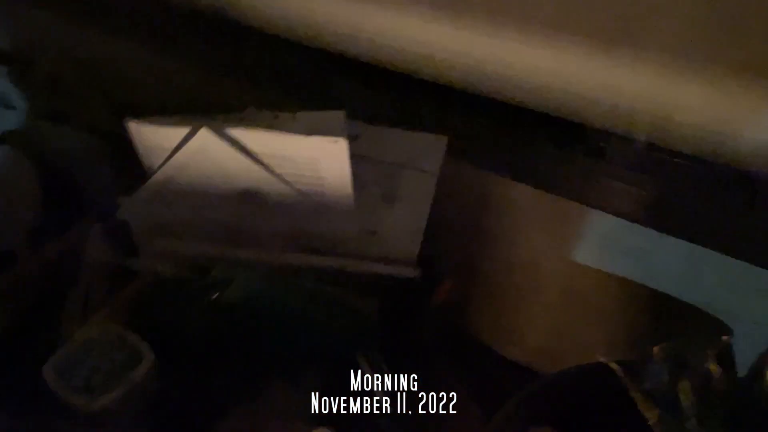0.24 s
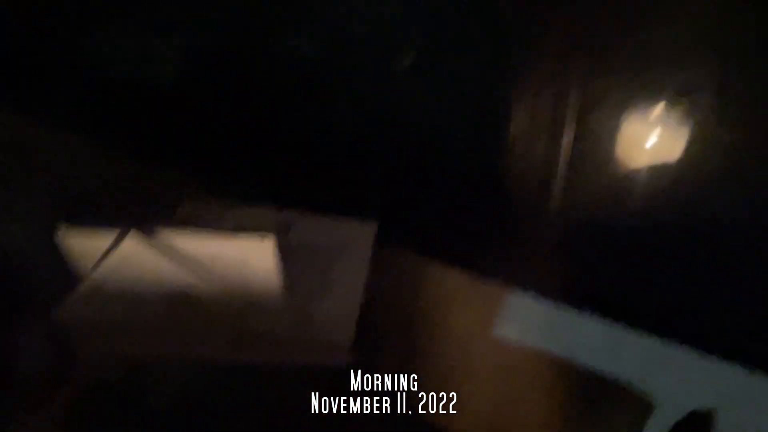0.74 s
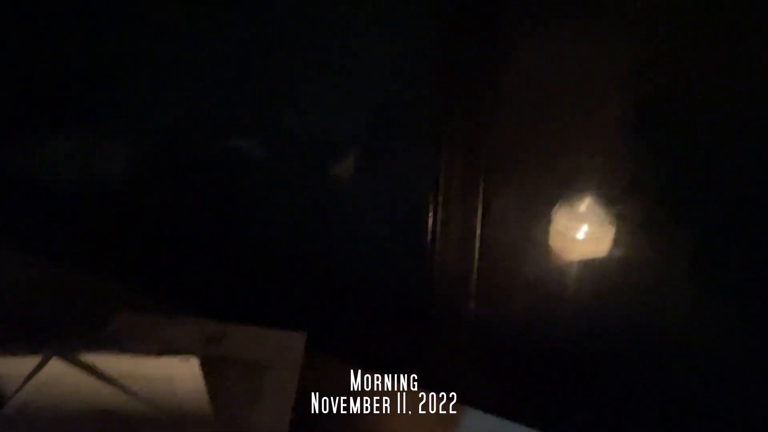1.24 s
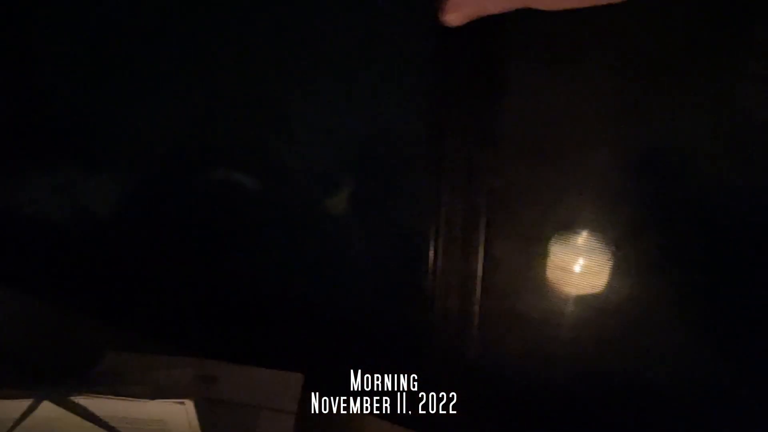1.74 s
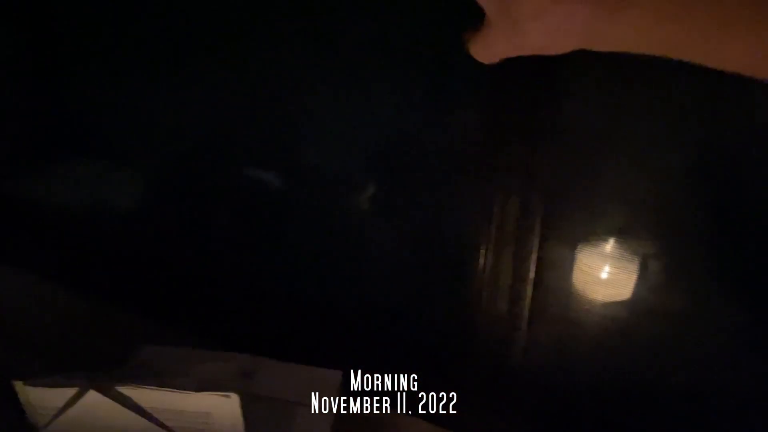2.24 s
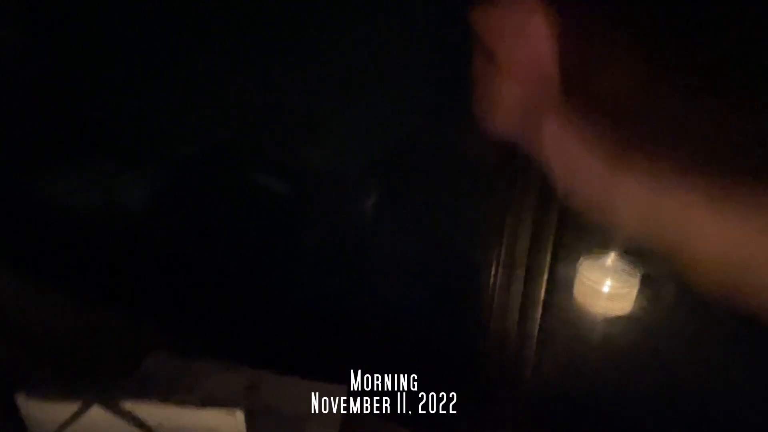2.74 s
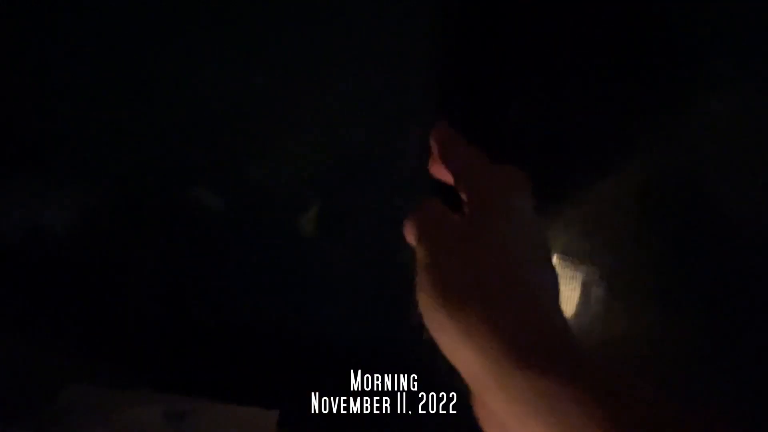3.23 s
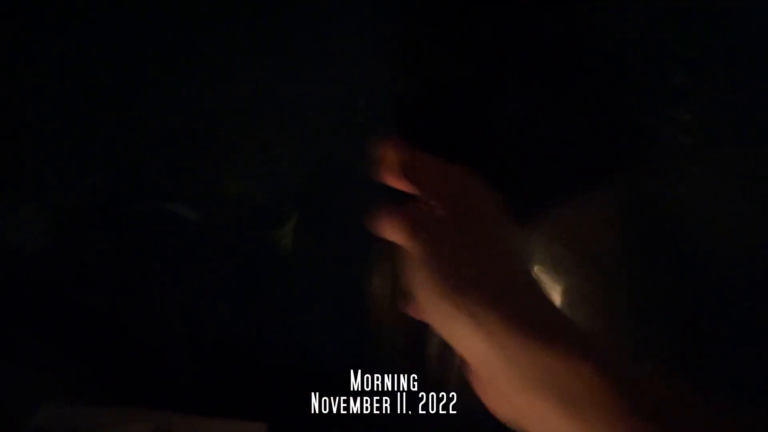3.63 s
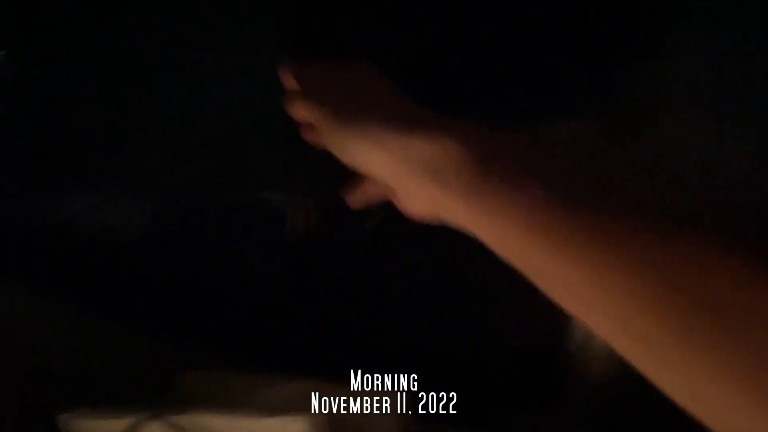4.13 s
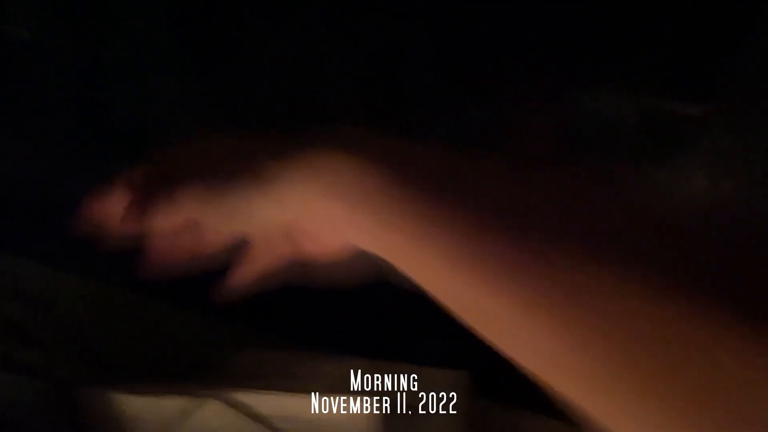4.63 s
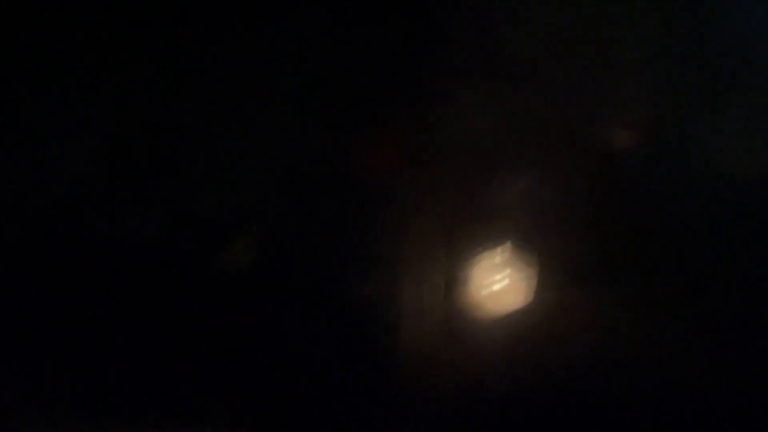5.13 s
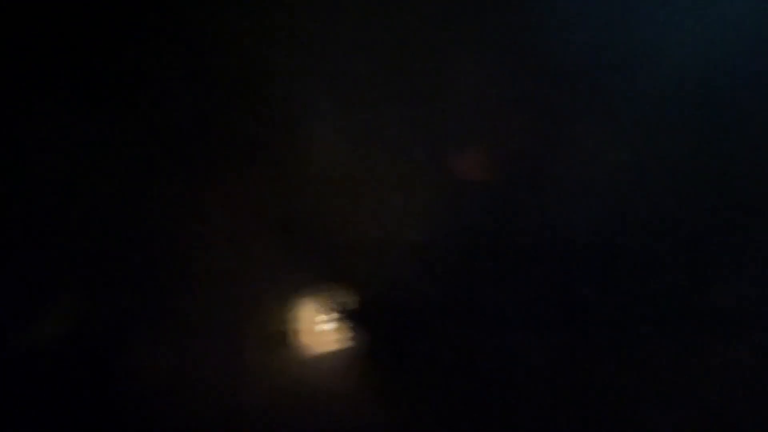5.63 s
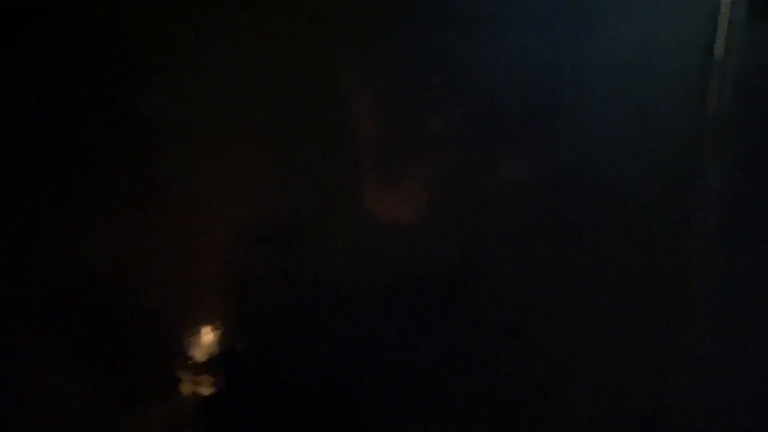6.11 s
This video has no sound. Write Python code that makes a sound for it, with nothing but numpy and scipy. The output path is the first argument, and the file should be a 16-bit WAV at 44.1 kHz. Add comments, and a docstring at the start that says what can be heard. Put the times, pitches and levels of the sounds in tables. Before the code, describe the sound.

In a small, quiet vehicle cabin, heard close by a handheld stereo microphone, knocks at 0.15-0.2 s start a ribbed blind rubbing along its rail. Its ribs blur into a rough whistle, sweeping up to about 0.5 s and down until 0.75 s, slightly left, with small ticks at 0.8-0.9 s. Then it is nearly silent, with faint touches and soft low bumps around 1.7-2.3 s. A crisp, hard latch clack snaps at 2.46 s, followed by a lighter bright click at 2.79 s. Small knocks at 3.3 s lead into a bright, scraping panel slide from 3.45 to 4.55 s, with a brief ribbed buzz near 3.8 s and the loudest blow, a deep thunk and sharp clack, at 4.27 s, rattling after. Smaller knocks fade by 5 s. Dull knocks return at 5.5 s, then soft rubbing and handling bumps until 6.37 s, over faint hiss and slight hum.

```python
"""A ribbed blind rubs and whistles along its rail, then a panel slides, among latch clacks and knocks on
the frame, inside a small, quiet vehicle cabin. Blows are modal ringing plus bursts of noise; friction is
coloured noise; the whistle is a sine that follows the rib rate. Low bumps are falling sines, handling
rumble is resonant noise, and the background is a faint hiss and hum. A hand-held two-port recorder hears it."""
import sys
import numpy as np
from scipy import signal
from scipy.fft import rfft, irfft, next_fast_len
from scipy.io import wavfile

SR = 44100
rng = np.random.default_rng(int(sys.argv[2]) if len(sys.argv) > 2 else 0)


def persist_wave(psi):
    """Save psi, clipped to +-1, as 16-bit WAV."""
    counts = np.round(np.clip(psi, -1, 1) * 32767).astype(np.int16)
    wavfile.write(sys.argv[1], SR, np.atleast_2d(counts).T)


def boost_factor(decibels):
    """Convert a level in decibels to a linear amplitude factor."""
    exponent = np.asarray(decibels, float) / 20
    return 10 ** exponent


N = 280917


def rms_one(x):
    """Normalisation: scale to unit rms."""
    return x / np.sqrt(np.mean(x ** 2) + 1e-20)


def in_time(rows):
    """Linear interpolation: table columns per sample, -150 outside the rows."""
    s, *columns = np.transpose(rows)
    return [np.interp(np.arange(N) / SR, s, column, left=-150, right=-150) for column in columns]


def at_hz(points, hz):
    """Logarithmic pitch scale: read a spectrum on a log-frequency axis."""
    points_hz, values = np.array(points).T
    return np.interp(np.log(hz), np.log(points_hz), values)


def drift(rate_hz):
    """Low-pass random process: slow chance of spread 1, computed at every 20th sample."""
    r = np.exp(-40 * np.pi * rate_hz / SR)
    white = rng.standard_normal(N // 20 + 4002)
    slow = signal.lfilter([1], [1, -2 * r, r * r], white)[4000:]   # drop the filter's start
    return np.interp(np.arange(N) / 20, np.arange(len(slow)), rms_one(slow))


# Left-right likeness of noise. Each row: frequency in Hz, likeness (0 unrelated, 1 identical).
STEREO_LIKENESS = [(60, 1), (250, .8), (700, 0.17), (1700, 0.16), (4000, 0.44), (6000, 0.7), (8000, 0.94),
                   (16000, 0.88)]


def bands(low_hz, top_hz):
    """Spatial coherence: yields (centre Hz, stereo third-octave noise of flat power per Hz)."""
    edges = 25 * 2 ** np.arange(0, 9.5, 1 / 3)
    white = rng.standard_normal((2, 2, N))   # neighbouring bands use different noise
    for k, (low, high) in enumerate(zip(edges, edges[1:])):
        if low_hz <= low < top_hz:
            hz = np.sqrt(low * high)
            band_pass = signal.butter(2, [low, high], "band", fs=SR, output="sos")
            mid, side = signal.sosfilt(band_pass, white[k % 2])
            alike = np.clip(at_hz(STEREO_LIKENESS, hz), 0, 1)
            yield hz, np.sqrt(1 + alike) * mid + np.sqrt(1 - alike) * side * [[1], [-1]]


def ring(force, hz, t60):
    """Damped resonator: a unit click sets a sine of height about 1 ringing, down 60 dB in t60 seconds."""
    r, w = boost_factor(-60 / (t60 * SR)), 2 * np.pi * hz / SR
    return signal.lfilter([0, np.sin(w)], [1, -2 * r * np.cos(w), r * r], force)


def dying(clicks, t60):
    """Exponential decay: each click starts an envelope that falls 60 dB in t60 seconds."""
    return signal.lfilter([1], [1, -boost_factor(-60 / (t60 * SR))], clicks)


# Latches, knocks and ticks. Each row: start in seconds, knock (low) level in dB, clack (middle) level in dB,
# tick (high) level in dB, frequency in Hz that the touched spot rings best. Levels drive the hit's layers.
BLOWS = [(0.153, -31, -46, -53, 418), (0.164, -31.5, -63, -47.5, 427), (0.212, -34.5, -46, -47, 433),
         (0.817, -44.5, -51.5, -49.5, 1830), (0.826, -46, -66, -49, 480), (0.897, -51, -52, -44.5, 1233),
         (0.922, -67, -66, -53.5, 1200), (1.079, -62, -75, -78, 513), (1.19, -48.5, -69, -87, 330),
         (1.652, -52, -66, -78, 430), (1.723, -52, -57, -75, 3800), (1.734, -49, -62, -81, 417),
         (1.806, -63, -80, -59, 3200), (2.051, -80, -70, -76, 1360), (2.269, -48.5, -57.5, -58.5, 310),
         (2.291, -56, -54.5, -59, 358), (2.327, -67, -55, -66, 312), (2.455, -40, -56, -26.5, 2480),
         (2.461, -26.5, -20, -21, 4770), (2.468, -24.5, -35, -35, 642), (2.723, -86, -70.5, -63, 1605),
         (2.779, -43.5, -52, -46, 617), (2.788, -55, -47, -37, 6300), (2.793, -36.5, -27.5, -29, 3270),
         (2.942, -62, -68, -59, 3570), (3.191, -61.5, -62, -59.5, 3320), (3.209, -54.5, -65, -66, 360),
         (3.281, -41.5, -69, -45.5, 600), (3.291, -36, -43.5, -61, 490), (3.307, -43, -47.5, -67, 650),
         (3.349, -34.5, -43, -62, 516), (3.889, -37, -51, -30.5, 393), (4.263, -25, -46, -39, 370),
         (4.282, -20, -27.5, -22, 4170), (4.296, -26, -41, -44, 800), (4.309, -31, -47, -41, 560),
         (4.402, -34, -47, -35, 4300), (4.447, -40.5, -53, -42, 427), (4.466, -32, -25.5, -65, 1420),
         (4.544, -46, -44.5, -58, 1090), (4.651, -51, -57, -76, 734), (4.672, -54.5, -49, -76, 752),
         (4.743, -48, -56.5, -71.5, 900), (4.819, -52.5, -63.5, -60, 1094), (4.882, -58.5, -85, -61, 1040),
         (5.019, -52, -64, -67, 344), (5.041, -74, -76, -70, 4000), (5.373, -47.5, -54, -49.5, 406),
         (5.42, -52.5, -60, -52.5, 2300), (5.486, -32.5, -42, -38, 500), (5.564, -38, -55, -55, 1090),
         (5.575, -35, -57, -66, 405), (5.622, -75, -54, -54, 3650), (5.919, -52, -66.5, -71, 423),
         (6.032, -45, -52.5, -87.5, 413), (6.087, -47.5, -60, -71.5, 412), (6.189, -58.5, -56, -55, 1290),
         (6.217, -30.5, -39.5, -39, 544), (6.268, -37.5, -48, -56, 487), (6.364, -41.5, -58, -55, 714)]
# Light touches scuff, hard blows are short. Each row: strongest level of the hit in dB, spread of touches in ms.
RATTLE_SPREAD = [(-62, 18), (-45, 9.8), (-25, 4)]


def contacts(count=7, fade=0.43):
    """Repeated impact: firm first touch, mostly weaker bounces; (sample, share of the hit), one row per hit."""
    s, force_db = np.array(BLOWS)[:, 0], np.array(BLOWS)[:, 1:4].max(axis=1)
    chance = rng.random((len(BLOWS), 2, count))
    late = np.sort(chance[:, 0], axis=1)
    spread_s = np.interp(force_db, *np.transpose(RATTLE_SPREAD)) / 1000
    at = s[:, None] + (late - late[:, :1]) * spread_s[:, None]
    share = (0.5 + 0.5 * chance[:, 1]) * np.exp(-fade * np.arange(count))
    return np.minimum(np.round(at * SR).astype(int), N - 1), share / share.sum(axis=1, keepdims=True)


def strikes(touches, hz, spot_db, gain=1, octaves=0.23):
    """Impulsive excitation: click train of all touches, as strong as each hit is near this pitch."""
    s, knock_db, clack_db, tick_db, spot_hz = np.transpose(BLOWS)
    place = np.clip(np.log2(hz / 900) / 1.18, 0, 2)   # 0 knock, 1 clack, 2 tick
    lower_db = knock_db + place * (clack_db - knock_db)
    upper_db = clack_db + (place - 1) * (tick_db - clack_db)
    level_db = np.where(place < 1, lower_db, upper_db)
    level_db = level_db + spot_db * np.exp(-(np.log2(hz / spot_hz) / octaves) ** 2)
    soft = np.clip((-18 - tick_db) / 10, 0, 1)   # softer ticks lose more of the top
    level_db = level_db - 5.3 * soft * max(np.log2(hz / 6000), 0)
    samples, shares = touches
    clicks = np.full((2, N), 1e-18)
    for side, side_gain in zip(clicks, np.broadcast_to(gain, (2, len(s)))):
        np.add.at(side, samples, (boost_factor(level_db) * side_gain)[:, None] * shares)
    return clicks


# Frame and panel modes. Each row: frequency in Hz, relative level in dB, undamped decay t60 in seconds.
FRAME_MODES = [(212, 0.5, .12), (310, -4.5, 0.011), (433, -2.5, 0.11), (476.6, -2.5, 0.14),
               (561, -1.5, 0.08), (645.3, -7, 0.24), (765, -4, 0.049), (921, -11, 0.079),
               (1040, -3.5, 0.079), (1222, -1, 0.054), (1467, 2, 0.03), (1667, 1, 0.046),
               (1790, 0.5, 0.017), (2000, -5.5, 0.017), (2293, -1, .06), (2620, -2, 0.025),
               (3110, -1.5, 0.024), (3430, -1, 0.033), (3980, -5, 0.073), (4450, -6, 0.068),
               (5320, -6, .05), (5720, -7, 0.071), (7200, -10.5, .04)]
# Colour of the broad crack. Each row: frequency in Hz, relative level in dB per Hz.
CRACK_COLOUR = [(250, 1), (600, -1.5), (1200, -3.5), (2500, -5), (5000, -12), (8000, -12.5), (12000, -17.5),
                (16000, -29)]
# Decay of the cabin tail. Each row: frequency in Hz, t60 in seconds.
CABIN_TAIL_T60 = [(250, 0.11), (600, 0.22), (1400, 0.15), (4000, 0.18), (10000, 0.15)]
OPEN_S, OPEN_RING_DB = 5.2, -6   # once the panel stands open the frame rings less


def hits(ring_db=-8, spot_db=12, crack_db=10, crack_spot_db=8, tail_db=-4, crack_t60=0.026,
         snap_db=12, snap_t60=0.0024, rise_cycles=3.4, spread_db=4.5):
    """Modal excitation: blows ring the frame, crack broadly and leave a tail dying band by band."""
    out, touches = np.zeros((2, N)), contacts()
    start_s, tick_db = np.array(BLOWS)[:, 0], np.array(BLOWS)[:, 3]
    hard = np.clip((tick_db + 50) / 25, 0, 1)   # only hard blows add a bright snap
    chance = rng.standard_normal((len(BLOWS), len(FRAME_MODES), 2))
    open_db = OPEN_RING_DB * (start_s > OPEN_S)
    for k, (hz, level_db, t60) in enumerate(FRAME_MODES):
        gain = boost_factor(ring_db + open_db + level_db + spread_db * chance[:, k].T)
        clicks = strikes(touches, hz, spot_db, gain, octaves=0.22)
        rise_t60 = min(rise_cycles / hz, t60 / 2)   # lows build up over a few cycles
        out += ring(clicks, hz, t60) - ring(clicks, hz, rise_t60)
    for hz, noise in bands(200, 16000):
        colour = boost_factor(at_hz(CRACK_COLOUR, hz))
        clicks = strikes(touches, hz, crack_spot_db)[0] * colour
        crack = dying(clicks, crack_t60) - dying(clicks, min(rise_cycles / hz, crack_t60 / 2))
        if hz > 1500:
            snap_clicks = strikes(touches, hz, crack_spot_db, hard)[0] * colour
            crack += boost_factor(snap_db) * dying(snap_clicks, snap_t60)
        # the cabin answers a moment late
        tail = dying(clicks, at_hz(CABIN_TAIL_T60, hz)) - dying(clicks, 0.021)
        out += noise * (boost_factor(crack_db) * crack + boost_factor(tail_db) * tail)
    return out


# Sliding friction, one list per slide. Each row: time in seconds, level of the rub's body in dB, level of its
# treble in dB, both before colour and roughness.
SLIDE_CURVES = [
    [(0.0, -52.5, -74.5), (0.12, -50.5, -67.5), (0.18, -44.5, -61.5), (0.318, -45, -55.5),
     (0.636, -45.5, -55.5), (0.788, -56, -69.5), (0.892, -78, -94), (0.98, -76.5, -99)],
    [(2.24, -76, -106), (2.314, -65.5, -82.5), (2.428, -68, -68), (2.45, -45.5, -57)],
    [(3.38, -79, -84), (3.452, -55, -69), (3.586, -49.5, -56), (3.674, -45.5, -51.5), (3.864, -47, -49),
     (4.316, -47, -54.5), (4.396, -48.5, -47.5), (4.51, -48.5, -62), (4.568, -64.5, -83),
     (4.64, -97.5, -112)],
    [(5.6, -70, -74), (5.976, -66, -74), (6.37, -57, -71.5)],
    [(1.63, -87.5, -95), (1.75, -66.5, -97.5), (1.9, -90, -99)],
    [(4.62, -72, -86.5), (4.834, -72, -88), (5.1, -89.5, -87.5)],
    [(2.79, -49, -58), (2.84, -60.5, -44), (2.86, -68, -77), (2.96, -89, -84), (3.05, -104, -92)],
]
# Colour of each slide, in the same order. Each row: frequency in Hz, relative level in dB per Hz.
SLIDE_COLOURS = [
    [(150, -10), (350, -8.5), (550, -9.5), (900, -5), (1400, -5.5), (2500, 0), (3800, 5.5), (6000, -1.5),
     (9000, -7.5), (16000, -20)],
    [(150, -8), (350, -7.5), (800, -12.5), (2000, -2.5), (4500, -1), (8000, -8), (16000, -27)],
    [(150, -9.5), (400, -13), (1100, -5), (2200, 1), (4000, 0.5), (6000, 0.5), (8000, -1), (12000, -16.5),
     (16000, -23.5)],
    [(150, 1), (400, -9), (800, -11.5), (1500, -12), (2500, -5.5), (3300, -6.5), (4300, -10.5), (5300, 2.5),
     (6500, -11.5), (8500, -11.5), (11000, -27), (16000, -17)],
    [(150, 22.5), (250, 3), (500, -2.5), (1200, -22), (3000, 4.5), (8000, -25), (16000, -50)],
    [(150, 0.5), (400, -8), (900, -4.5), (2000, -6), (4000, -7), (8000, -8.5), (16000, -53)],
    [(150, 14.5), (500, -5), (1500, -20.5), (2400, -11), (3500, 3.5), (5000, -15.5), (8000, -22),
     (16000, -29.5)],
]


def slides(patchy_db=1.0, grain_db=1.0, frame_db=-36, damping=0.22):
    """Sliding friction: dense rough noise that also sets the damped frame modes humming."""
    out, grain = 0, grain_db * drift(150)
    curves = [in_time(rows) for rows in SLIDE_CURVES]
    for hz, noise in bands(140, 16000):
        bright = np.clip(np.log2(hz / 1200) / 1.46, 0, 1)   # 0 body, 1 treble
        level = 0
        for (body, treble), colour in zip(curves, SLIDE_COLOURS):
            level = level + boost_factor(body + bright * (treble - body) + at_hz(colour, hz))
        out = out + noise * level * boost_factor(8.5 + grain + patchy_db * drift(9.1))
    humming = sum(ring(out, hz, damping * t60) for hz, level_db, t60 in FRAME_MODES)
    return out + boost_factor(frame_db) * humming


# Ribbed surfaces passing an edge. Each row: heard from and heard until in seconds, fastest moment in seconds,
# speeding-up and slowing-down times in seconds, top rate in ribs per second, level in dB before resonances.
RIB_STROKES = [(0.181, 0.749, 0.51, 0.37, 0.29, 2180, -50), (3.767, 3.916, 3.65, 0.3, 0.3, 1300, -54)]
# Neighbouring edges with other rib spacing. Each row: rate ratio, relative level in dB.
NEIGHBOUR_EDGES = [(0.94, -3.5), (0.37, -7.5)]
# The whistle swells where it meets these. Each row: frequency in Hz, width in Hz, boost in dB.
WHISTLE_RESONANCES = [(2214, 80, 10.5), (840, 90, 4.5), (420, 160, 7.5)]


def ribs(width_hz=40, steady=0.44, broken_db=4.0, pan_db=3, fade_s=0.013):
    """Periodic excitation: ribs blur into a rough whistle whose pitch follows the hand's arc of speed."""
    out, t = np.zeros((2, N)), np.arange(N) / SR
    for start, end, fastest, rise, fall, top_hz, stroke_db in RIB_STROKES:
        from_peak = (t - fastest) / np.where(t < fastest, rise, fall)
        rate = top_hz * np.clip(1 - from_peak ** 2, 0, 1)
        boost_db = sum(db * np.exp(-((rate - hz) / wide) ** 2) for hz, wide, db in WHISTLE_RESONANCES)
        level = boost_factor(stroke_db + broken_db * drift(14) + boost_db)
        level = level * np.clip(np.minimum(t - start, end - t) / fade_s, 0, 1)
        for ratio, edge_db in [(1, 0)] + list(NEIGHBOUR_EDGES):
            phase = 2 * np.pi * np.cumsum(ratio * rate) / SR
            for side in out:
                rough = (steady + drift(width_hz)) * np.sin(phase) + drift(width_hz) * np.cos(phase)
                side += level * boost_factor(edge_db) * rough
    return out * boost_factor(pan_db * np.array([[0.5], [-0.5]]))   # louder on the left


# Low bumps through hand and floor. Each row: start in seconds, level in dB before the rise and decay,
# settled frequency in Hz, t60 in seconds (never under 0.03).
LOW_BUMPS = [(0.152, -37.5, 70, 0.28), (0.268, -39.5, 88.8, 0.31), (0.326, -36, 148, 0.1),
             (0.501, -38.5, 96.4, 0.15), (0.61, -29.5, 102, 0.091), (0.788, -43, 113.5, 0.19),
             (1.193, -49, 127, 0.14), (1.727, -33, 89.5, 0.13), (1.8, -36, 61.3, 0.22),
             (1.906, -46.5, 83.7, 0.62), (2.05, -40.5, 59.8, 0.17), (2.126, -36.5, 63, 0.3),
             (2.313, -38.5, 75, 0.17), (2.379, -46, 70.0, 0.23), (2.788, -29, 72.7, 0.079),
             (2.831, -34, 59, 0.13), (3.25, -36.5, 74.2, 0.043), (3.36, -36, 74.5, 0.09),
             (3.452, -38, 141.3, 0.25), (3.552, -33, 75, 0.1), (3.608, -27, 84, 0.087),
             (3.666, -25, 67, 0.16), (3.888, -28, 154, 0.054), (3.932, -30.5, 96.5, 0.13),
             (4.038, -33.5, 72.7, 0.43), (4.089, -37, 93.6, 0.13), (4.264, -24.5, 173, 0.17),
             (4.276, -11, 69.4, 0.11), (4.308, -14.5, 69.5, 0.072), (4.338, -34, 61, 0.047),
             (4.476, -37.5, 120, 0.28), (4.553, -40, 138.8, 0.23), (5.028, -40.5, 73.3, 0.12),
             (5.5, -29.5, 96.6, 0.1), (5.564, -33.5, 133, 0.081), (5.599, -38, 88.8, 0.11),
             (6.036, -36, 65.6, 0.14), (6.096, -41, 154, 0.2), (6.215, -36, 121, 0.22),
             (6.269, -32.5, 115, 0.078)]


def bumps(sweep=2.0, sweep_s=0.0044, rise_s=0.0082):
    """Dispersion of bending waves: the higher part comes first, so the pitch drops onto the ring."""
    out, t = np.zeros(N + SR // 2), np.arange(SR // 2) / SR
    for s, level_db, hz, t60 in LOW_BUMPS:
        phase = 2 * np.pi * hz * (t + sweep * sweep_s * (1 - np.exp(-t / sweep_s)))
        envelope = (1 - np.exp(-t / rise_s)) * boost_factor(level_db - 60 * t / max(t60, 0.03))
        out[round(s * SR):][:len(t)] += np.sin(phase) * envelope
    return out[:N]


# Handling rumble. Each row: time in seconds, level in dB.
RUMBLE_LEVEL = [(0.0, -40), (0.16, -57), (0.71, -48.5), (1.0, -67.5), (1.65, -69), (1.72, -50), (1.92, -59),
                (2.59, -65), (3.21, -67), (3.26, -55.5), (3.56, -51), (3.95, -53), (4.19, -48),
                (4.58, -49.5), (4.63, -59), (5.27, -63), (5.43, -54), (5.89, -60.5), (6.3, -49),
                (6.37, -53)]
# Colour of the rumble. Each row: frequency in Hz, relative level in dB per Hz.
RUMBLE_COLOUR = [(25, -22.5), (40, -7.5), (55, -0.5), (70, 1.5), (120, 9), (170, -18), (230, -26.5),
                 (300, -21.5)]
BODY_HZ, BODY_WIDTH_HZ, BODY_DB = 67, 42, -4   # lowest resonance of the cabin


def rumble(lumpy_db=3.5):
    """Resonance under random force: lumpy low noise from the grip and the swaying cabin."""
    low = 0
    for hz, noise in bands(25, 300):
        low = low + noise * boost_factor(at_hz(RUMBLE_COLOUR, hz) + lumpy_db * drift(24))
    low = rms_one(low)
    body_t60 = np.log(1000) / (np.pi * BODY_WIDTH_HZ)   # bandwidth sets the decay
    body = rms_one(ring(low, BODY_HZ, body_t60))
    return rms_one(low + boost_factor(BODY_DB) * body) * boost_factor(in_time(RUMBLE_LEVEL)[0])


# Colour of the hiss. Each row: frequency in Hz, relative level in dB per Hz.
HISS_COLOUR = [(100, 1.5), (200, -12.5), (400, -17), (1000, -24.5), (2000, -29), (5000, -35.5),
               (9000, -37.5), (12000, -59.5), (16000, -57.5)]
# Faint hum. Each row: time in seconds, level in dB about which it wavers.
HUM_LEVEL = [(0, -45), (1.0, -78), (3.0, -72), (4.5, -66.5), (5.0, -62), (6.37, -62.5)]


def cabin_air(hiss_db=-75, hum_hz=121):
    """Stationary noise and a modulated tone: faint hiss and a hum wavering in pitch and level."""
    hiss = sum(noise * boost_factor(at_hz(HISS_COLOUR, hz) + 1.0 * drift(2.1)) for hz, noise in bands(90, 16000))
    waver_db = 2.5 * drift(6)
    phase = 2 * np.pi * np.cumsum(hum_hz + 3.0 * drift(4.3)) / SR
    hum = np.sin(phase) * boost_factor(in_time(HUM_LEVEL)[0] + waver_db)
    return rms_one(hiss) * boost_factor(hiss_db) + hum


def scene():
    """Superposition: the sum of all sources in the cabin."""
    return hits() + slides() + ribs() + bumps() + rumble() + cabin_air()


# Phase between the microphone ports. Each row: frequency in Hz, lead of the right port in cycles.
PORT_LEAD = [(4500, 0), (5300, .01), (8200, .5), (11300, .99), (12200, 1.01), (14500, 1.5), (16000, 1.55)]
# Level between the ports. Each row: frequency in Hz, left minus right in dB.
PORT_BALANCE = [(100, -2), (1000, -1), (3000, 2), (5500, 3.5), (8000, 0)]


def ports(dry):
    """Interchannel phase and level: two microphone ports differ in both, varying with frequency."""
    size = next_fast_len(N + 2048)
    hz = np.maximum(np.arange(size // 2 + 1) * SR / size, 1)
    lead = np.exp(1j * np.pi * np.interp(hz, *np.transpose(PORT_LEAD)))   # half the lead on each side
    tilt = boost_factor(at_hz(PORT_BALANCE, hz) / 2)
    return irfft(rfft(dry, size) * np.array([tilt / lead, lead / tilt]), size)[:, :N]


def top_cut(x):
    """Nothing passes above the cut-off."""
    return signal.sosfilt(signal.butter(12, 16660, fs=SR, output="sos"), x)


def record(dry):
    """Two-port pickup: the recorder hears the cabin through both microphone ports."""
    mix = ports(dry)
    return top_cut(mix)


dry = scene()
out = record(dry)
persist_wave(out)
```